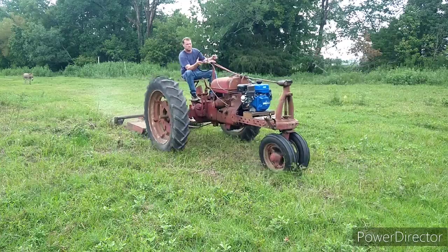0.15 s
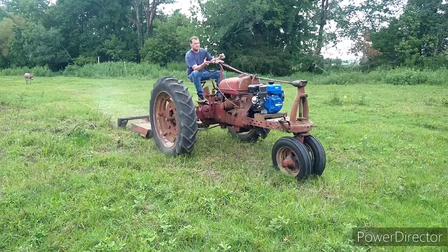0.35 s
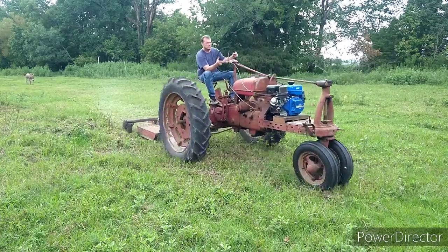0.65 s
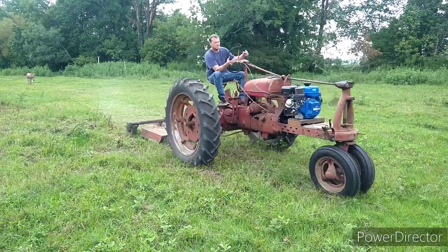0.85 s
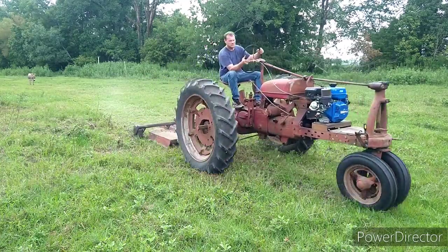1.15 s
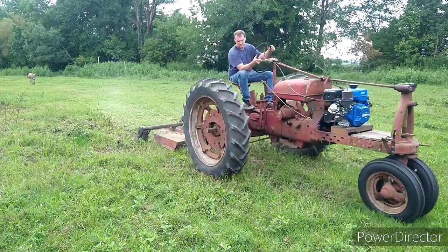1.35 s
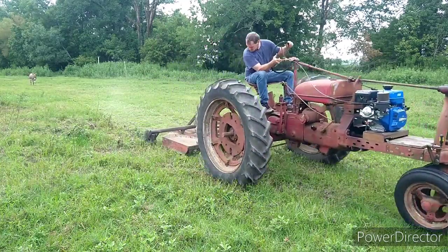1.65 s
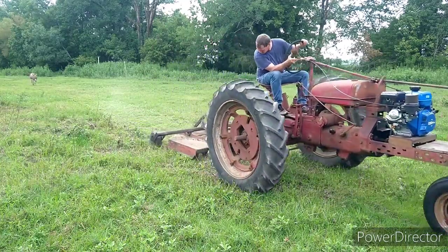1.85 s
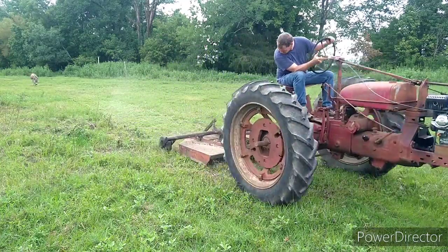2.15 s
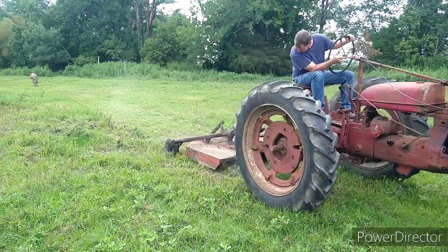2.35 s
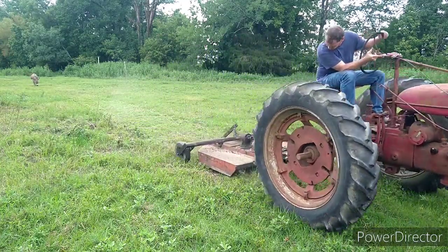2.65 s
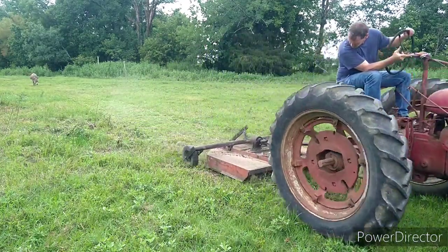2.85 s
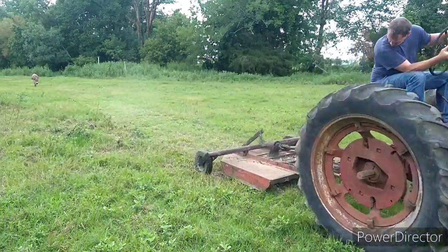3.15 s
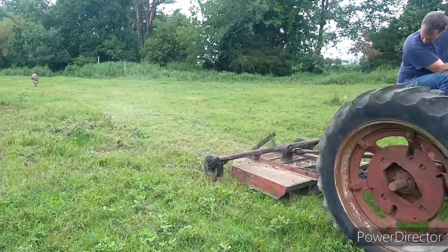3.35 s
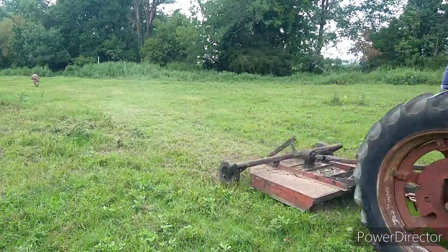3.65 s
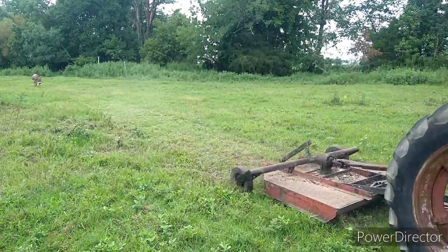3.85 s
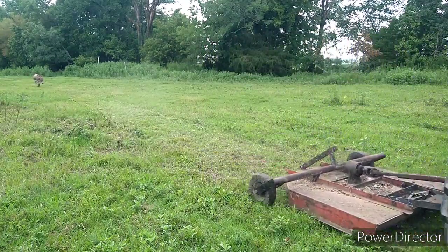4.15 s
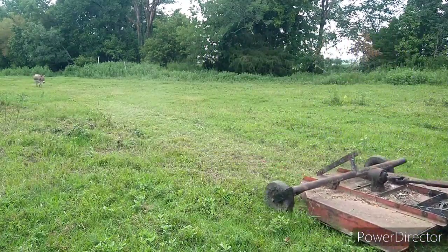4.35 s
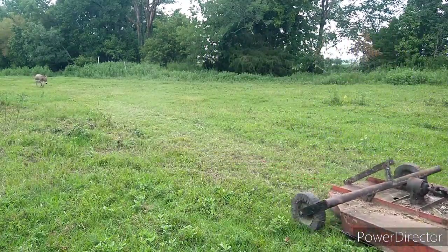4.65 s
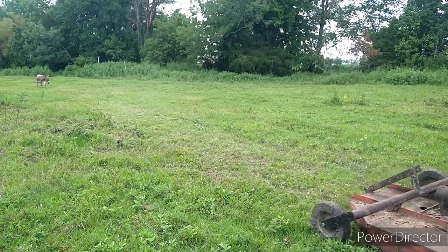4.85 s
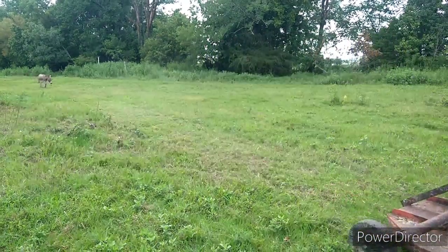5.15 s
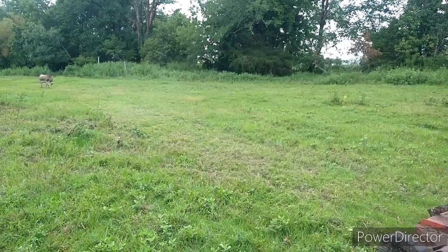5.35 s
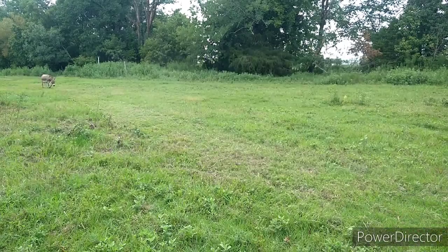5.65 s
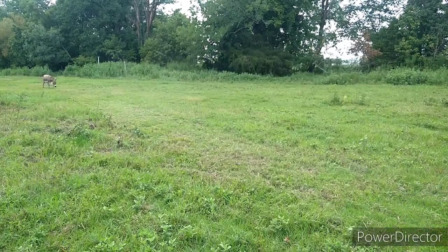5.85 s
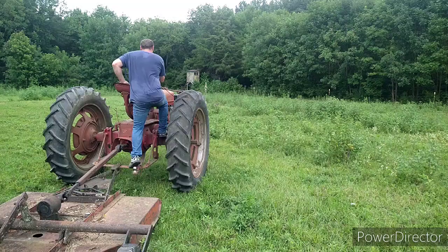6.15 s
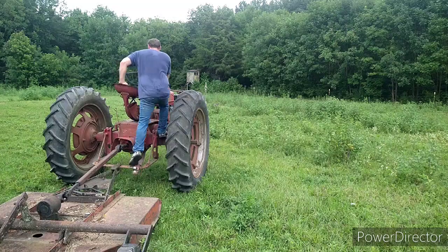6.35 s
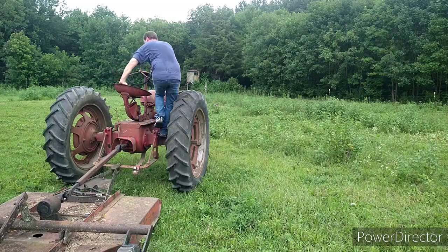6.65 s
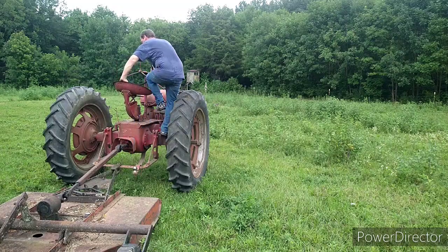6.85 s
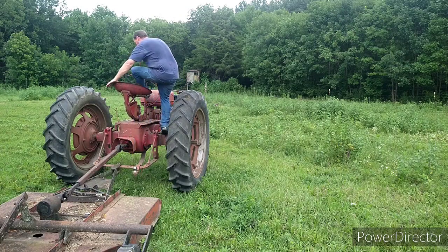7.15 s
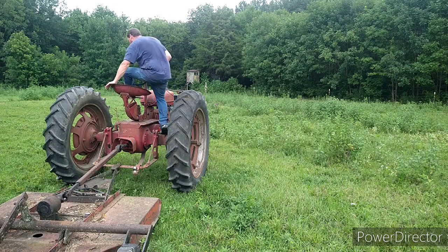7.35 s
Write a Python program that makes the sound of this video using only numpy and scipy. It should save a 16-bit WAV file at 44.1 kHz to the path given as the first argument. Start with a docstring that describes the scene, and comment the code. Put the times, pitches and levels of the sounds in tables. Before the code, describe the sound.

A tractor's small engine drones and clatters past towing a mower, fades away, and is then heard idling softly a few metres off.

```python
"""A small single-cylinder petrol engine drives a tractor and mower left to right past a two-port
microphone in a pasture. Each firing rings the muffler and casing and frees a jet of gas, over the noise
of fan, valves and mower; the governor hunts. The sound dips at 4.2 s, fades and drops out; a loud snippet
cuts back in. At 6.27 s the scene cuts to the same engine idling a few metres away, heard from behind:
the pipe thuds over a hum and ringing, a whine comes and goes, and at 7 s a shoe scuffs on the tractor."""
import sys
import numpy as np
from scipy import signal
from scipy.io import wavfile
from scipy.ndimage import uniform_filter1d, map_coordinates

SR = 44100
rng = np.random.default_rng(int(sys.argv[2]) if len(sys.argv) > 2 else 0)


def output_pcm(signal):
    """Save a mono or channel-first signal as 16-bit PCM at the path in sys.argv[1].

    Samples are clipped to [-1, 1] before scaling.
    """
    pcm = np.clip(np.atleast_2d(signal).T, -1, 1) * 32767
    wavfile.write(sys.argv[1], SR, np.round(pcm).astype(np.int16))


N = 330750
TIME = np.arange(N) / SR
SIDE_ON_MS = .48   # delay between the ports for a source fully to one side
CUT_S = 6.2706
IDLE_FIRST_S, IDLE_PERIOD_S = 6.2475, .07092


def from_db(db):
    """Amplitude ratio: tenfold for every 20 dB."""
    return 10 ** (np.asarray(db) / 20)


def rms_one(x):
    """Normalisation to unit mean power."""
    return x / np.sqrt(np.mean(x ** 2) + 1e-20)


def in_time(rows):
    """Linear interpolation of a table's columns at every sample."""
    times, *columns = np.transpose(rows)
    return [np.interp(TIME, times, column) for column in columns]


def at_hz(points, hz):
    """Interpolation of a spectrum's columns on a logarithmic frequency axis."""
    freqs, *columns = np.transpose(points)
    return [np.interp(np.log(hz), np.log(freqs), column) for column in columns]


def drift(rate_hz):
    """Low-passed noise: a slow random fluctuation of unit rms."""
    pole = np.exp(-80 * np.pi * rate_hz / SR)
    slow = signal.lfilter([1], [1, -2 * pole, pole * pole], rng.standard_normal(N // 40 + 2002))[2000:]
    return np.interp(np.arange(N) / 40, np.arange(len(slow)), rms_one(slow))


def resonate(x, hz, width):
    """Forced response of a damped oscillator, at unit rms."""
    radius = np.exp(-np.pi * width / SR)
    feedback = [1, -2 * radius * np.cos(2 * np.pi * hz / SR), radius * radius]
    return rms_one(signal.lfilter([1, 0, -1], feedback, x + 1e-18))


def clicks(times, spread_db):
    """Impulse excitation: one pulse of random strength at each time."""
    out = np.zeros(N)
    at = np.clip(np.round(times * SR).astype(int), 0, N - 1)
    out[at] = from_db(spread_db * rng.standard_normal(len(at)))
    return out


def ports(shared, own, hz, lag_ms):
    """Partial coherence: two ports mix shared and scattered sound; the microphone shades the left."""
    # likeness of the ports: (frequency [Hz], coherence in front [ratio], change side-on [ratio])
    likeness = [(30, .7, 0), (60, .97, 0), (500, .98, 0), (1200, .98, -.25), (2000, .88, -.03),
                (2800, .84, -.06), (4000, .72, -.15), (8000, .55, -.12), (14000, .3, 0)]
    # close by, engine and mower fill a wide angle and the ports agree less: (time [s], exponent [1])
    spread = [(0, 1), (1.5, 1.1), (2.4, 1.6), (2.9, 1.3), (3.6, 2.3), (4.3, 1.8), (5.0, 1), (5.6, .7),
              (6.27, .7), (6.28, 1)]
    # left port re right: (frequency [Hz], level in front [dB], change side-on [dB])
    shade = [(60, -0.9, 2.5), (400, 0.7, 1), (1200, 0, 1.5), (2500, -0.6, 0.7), (5000, -0.5, -3),
             (6600, -0.5, -6), (8940, -6.5, -3), (11000, -1.5, -6.5), (13830, 2, -11)]
    front, side = at_hz(likeness, hz)
    coherence = np.clip(front + side * lag_ms / SIDE_ON_MS, 0, 1) ** in_time(spread)[0]
    front_db, side_db = at_hz(shade, hz)
    tilt = from_db((front_db + side_db * lag_ms / SIDE_ON_MS) / 2)
    pair = np.sqrt(coherence) * np.array([shared, shared]) + np.sqrt(1 - coherence) * own
    return pair * [tilt, 1 / tilt]


def left_late(pair, lag_ms):
    """Path difference shifts the left channel in time; a positive lag delays it."""
    late = map_coordinates(pair[0], [np.arange(N) - lag_ms * SR / 1000], order=3, mode="nearest")
    return np.array([late, pair[1]])


def banded_noise(spectrum, level_db, lag_ms, flicker_db):
    """Random amplitude modulation of third-octave noise bands, each following level_db(hz)."""
    out, common_flicker = 0, drift(6)
    edges = 28 * 2 ** (np.arange(29) / 3)
    centres = np.sqrt(edges[1:] * edges[:-1])
    gains = from_db(at_hz(spectrum, centres)[0])
    gains /= np.sqrt(np.sum(gains ** 2 * np.diff(edges)) / (SR / 2))
    white = rng.standard_normal((2, 3, N))
    for k, hz in enumerate(centres):
        band = signal.sosfilt(signal.butter(2, edges[k:k + 2], "band", fs=SR, output="sos"), white[k % 2])
        envelope = from_db(level_db(hz) + flicker_db * (0.58 * common_flicker + drift(14.0)))
        out = out + gains[k] * envelope * ports(band[0], band[1:], hz, lag_ms)
    return out


def rings(modes, lag_ms):
    """Resonances driven by noise; modes are (frequency [Hz], width [Hz], level [dB])."""
    white, out = rng.standard_normal((3, N)), 0
    for hz, width, level_db in modes:
        held = resonate(resonate(white, hz, width), hz, width)
        out = out + from_db(level_db) * ports(held[0], held[1:], hz, lag_ms)
    return out


def chamber(pulses, hz, width, late_ms=0, run_in_firings=8):
    """Three resonators in cascade give a steep-sided peak; earlier firings have set it going."""
    first = np.argmax(pulses > 0)
    period = np.argmax(pulses[first + 1:] > 0) + 1
    lead = np.zeros(run_in_firings * period)
    lead[first % period::period] = 1
    train = np.roll(np.concatenate([lead, pulses]), round(late_ms * SR / 1000))
    return resonate(resonate(resonate(train, hz, width), hz, width), hz, width)[-N:]


def governor(edge_s=.04, recovery_s=.09, full_loss_hz=3.0):
    """Hunting: each time the throttle shuts, the exhaust booms and speed bleeds away, then recovers."""
    # speed that the governor aims for: (time [s], firing rate [Hz])
    target_speed = [(0, 41.66), (.5, 41.95), (.8, 42.7), (1.25, 43.5), (1.6, 42.44), (2.15, 42.77),
                    (2.7, 42.1), (3.3, 43.45), (3.9, 41.86), (4.6, 42.93), (5.0, 42.0), (5.5, 41.7),
                    (5.75, 41.2), (6.3, 41.49)]
    # throttle closures: (start [s], length [s], firing rate lost [Hz], boom [dB])
    stumbles = [(.86, .16, 3.3, -37), (1.26, .11, 3.15, -36.5), (1.49, .06, 1.4, -55), (1.74, .06, .9, -55),
                (2.17, .11, 2.0, -36), (2.5, .14, 1.95, -55), (2.75, .06, 1.4, -55), (2.94, .06, 1.3, -55),
                (3.13, .08, 1.35, -55), (3.34, .15, 2.7, -41), (3.69, .12, .7, -50), (3.96, .08, 1.8, -41),
                (4.17, .06, 1.55, -46), (4.41, .06, 1.0, -50), (4.62, .12, 1.9, -43), (5.29, .07, 1.1, -45),
                (5.5, .07, .6, -55)]
    shut, lost_hz, boom = 0, 0, 0
    for start, length, loss_hz, boom_db in stumbles:
        age = TIME - start
        closed = np.clip(np.minimum(age, length + edge_s - age) / edge_s, 0, 1)
        shut += closed * loss_hz / full_loss_hz
        boom += from_db(boom_db) * closed
        recovery = np.exp(-np.maximum(age - length, 0) / recovery_s)
        lost_hz += loss_hz * np.clip(age / length, 0, 1) * recovery
    return in_time(target_speed)[0] - lost_hz, shut, boom


def pass_levels(shut, boom, snippet_s=6.24, snippet_db=8):
    """Envelopes of exhaust notes, clatter and hiss over time; after the fade a loud snippet cuts in."""
    # loudness as the tractor passes: (time [1/25 s, counted from -0.8 s], crank throb [dB], boom [dB],
    # eleven higher muffler notes from low to high [dB], clatter [dB], hiss [dB])
    envelopes = [(24.9, -38, -47, -70, -45, -37, -25.5, -24, -32.5, -32, -66, -63, -40, -52, -33.5, -28.5),
                 (34.2, -38, -51, -70, -39, -40, -25, -23, -38, -34, -56, -60, -38.5, -55, -33.5, -28),
                 (39.5, -38, -48, -65, -29, -32.5, -26.5, -24, -45, -42, -40, -62, -38, -55, -32.5, -28.5),
                 (47.8, -37, -49, -65, -30, -39.5, -29.5, -23, -32.5, -39, -45, -46, -40, -57, -33.5, -29.5),
                 (60.8, -37.5, -49, -69.5, -27, -20.5, -22.5, -25, -30, -32.5, -35.5, -55, -44, -50, -32.5, -27.5),
                 (70.3, -38, -54, -58, -30.5, -20, -30.5, -28.5, -32.5, -34.5, -38, -57, -43, -44, -33.5, -26),
                 (78.1, -40.5, -53, -45.5, -31, -21.5, -20.5, -41, -58, -38, -48, -56, -57, -41, -30.5, -27.5),
                 (86.7, -38.5, -63, -43.5, -27.5, -20, -23.5, -38, -41, -31.5, -36, -45, -49, -49.5, -32.5, -26.5),
                 (92.4, -42, -66, -42, -25, -20.5, -23, -37.5, -47, -32.5, -47, -67, -54, -57, -32.5, -28),
                 (96.6, -44, -64, -36, -26, -19.5, -24.5, -37, -34, -29, -39.5, -67, -57, -45, -32.5, -27),
                 (101.9, -47, -64, -38, -28.5, -21, -25, -38, -41, -29.5, -46, -60, -59, -39, -32, -27.5),
                 (109, -44, -59, -40, -58, -23.5, -24.5, -61, -37, -36, -33, -36, -64, -32, -31.5, -28),
                 (116.6, -42, -57, -34.5, -41, -23.5, -24, -51, -28, -30.5, -31, -37, -61, -39, -33, -28),
                 (121.3, -43, -48, -43.5, -29.5, -20, -23.5, -45, -37, -33, -31, -44, -61, -58, -34, -27.5),
                 (128, -43.5, -54.5, -48, -26.5, -19.5, -23, -35, -30, -30, -32, -57, -58, -52, -34.5, -27.5),
                 (133.6, -44, -60, -53, -31, -20.5, -25.5, -38, -45, -46, -40, -55, -60, -55, -33, -27),
                 (137.8, -44, -62, -58, -36, -24, -22.5, -45, -39, -45, -45, -43, -60, -56, -33, -29),
                 (142, -44, -54, -60, -40, -26, -22.5, -40, -47, -54, -60, -46, -60, -58, -32.5, -27.5),
                 (151.5, -44, -54, -62, -35, -27, -23, -39, -42, -60, -60, -46, -60, -60, -32.5, -27.5),
                 (156.8, -44, -43, -63, -36, -29.5, -28, -29.5, -40, -47, -45, -47, -54, -60, -34, -28),
                 (168, -37, -40.5, -61, -36, -27, -25, -31, -53, -57, -59, -61, -59.5, -60, -32, -29)]
    # effect of a full stumble on each of those parts: (level change [dB])
    stumble_db = [-2, -45, 6.5, -2.5, -1, 2.5, -2, -0.5, -1, -3, 8.5, -1.5, -7, 0, -1]
    # the pass fades out: (time [s], level [dB])
    fade = [(4.5, 1.5), (5.0, -2.5), (5.45, -5.5), (5.7, -9.5), (6.0, -14.5), (6.2, -28)]
    ticks, *columns = np.transpose(envelopes)
    times = ticks / 25 - .8
    levels = [np.interp(TIME, times, column) + change_db * shut
              for column, change_db in zip(columns, stumble_db)]
    levels[1] = 20 * np.log10(from_db(levels[1]) + boom)
    fade_db = np.where(TIME < snippet_s, in_time(fade)[0], snippet_db)
    return [level + fade_db for level in levels]


def firings(cycles, last_s=6.2, jitter_s=.00003):
    """Combustion gives one pressure pulse a cycle."""
    # pulses of the split-second snippet of engine sound just before the scene change: (time [s])
    snippet_pulses = [6.2255, 6.2495]
    fired = TIME[1:][np.diff(np.floor(cycles)) > 0]
    fired = np.append(fired[fired < last_s], snippet_pulses)
    return clicks(fired + jitter_s * rng.standard_normal(len(fired)), spread_db=.35)


def muffler(pulses, notes_db, lag_ms, waver_db=.8):
    """Cavity resonance: the pulses ring each muffler chamber after its own short delay."""
    # exhaust resonances: (frequency [Hz], width [Hz], delay [ms])
    modes = [(85.4, 20, 1.5), (130, 55, 1.5), (195, 18, 8.4), (283, 80, 5.14), (298, 104, 7.85),
             (346.5, 106, 7.43), (429, 123, 4.49), (533.5, 130, 2.24), (562, 84, 5.4), (584, 58, 0),
             (644, 121, 3.89), (856, 118, 2.5), (975, 80, 1.5)]
    share = np.sqrt(CUT_S * SR / N)   # refers the rms to the length of the pass
    out = 0
    for (hz, width, late_ms), level_db in zip(modes, notes_db):
        note = chamber(pulses, hz, width, late_ms)
        out += share * from_db(level_db + waver_db * drift(5.2)) * ports(note, 0, hz, lag_ms)
    return out


def casing(pulses, clatter_db, lag_ms):
    """Structural resonance: every firing rings the casing's weaker modes."""
    # casing modes: (frequency [Hz], width [Hz], level re clatter [dB], change side-on [dB])
    modes = [(159.6, 68, -12, -2), (736, 114, -15.5, 0.5), (1184, 82, -12, -4)]
    out = 0
    for hz, width, level_db, side_db in modes:
        gain = from_db(clatter_db + level_db + side_db * lag_ms / SIDE_ON_MS)
        out += gain * ports(chamber(pulses, hz, width), 0, hz, lag_ms)
    return out


def gas_jet(pulses, hiss_db, lag_ms, band_hz=(8600, 12000), decay_s=0.01, re_hiss_db=-6.5):
    """Jet noise: gas escapes in a short bright burst at each firing."""
    pole = np.exp(-1 / (decay_s * SR))
    burst = rms_one(signal.lfilter([1], [1, -2 * pole, pole * pole], pulses))
    bandpass = signal.butter(2, band_hz, "band", fs=SR, output="sos")
    gas = signal.sosfilt(bandpass, rng.standard_normal((3, N)))
    return from_db(hiss_db + re_hiss_db) * burst * ports(gas[0], gas[1:], band_hz[0], lag_ms)


def machinery_racket(clatter_db, hiss_db, lag_ms, treble_from_hz=2700):
    """Broadband noise of fan, valve gear and mower, its colour changing with bearing."""
    # low part of the noise: (frequency [Hz], relative spectral density [dB])
    rumble = [(28, -33), (50, -29), (100, -19), (150, -24), (210, -21), (330, -17), (450, -19), (600, -23),
              (780, -21)]
    # high part: (frequency [Hz], relative spectral density [dB])
    racket = [(850, -15.5), (1250, -21.5), (1700, -25), (2200, -23.5), (2600, -24.5), (3000, -13.5),
              (3400, -12), (4100, -12.5), (5000, -14), (6300, -20), (8500, -14), (11000, -20), (13500, -24),
              (16000, -18.5)]
    # colour gained from front to side: (frequency [Hz], level change [dB])
    side_colour = [(60, -9.5), (190, 5.5), (400, 10.5), (800, -6), (1000, 0.5), (1300, -8), (2000, -1.5),
                   (2700, 0.5), (3600, -3), (5000, -0.5), (6300, 8), (8500, -1.5), (11000, 1), (14500, 1)]

    def band_db(hz):
        """Treble follows the hiss and lower bands the clatter, tilted by bearing."""
        level_db = hiss_db + 0.5 if hz > treble_from_hz else clatter_db + 12.0
        return level_db + at_hz(side_colour, hz)[0] * (lag_ms / SIDE_ON_MS - .5)

    return banded_noise(rumble + racket, band_db, lag_ms, flicker_db=1.28)


def mower_whirr(lag_ms, side_rise_db=9.5):
    """Noise-driven resonances of the mower, heard more from the side."""
    # mower modes: (frequency [Hz], width [Hz], level in front re hiss [dB])
    modes = [(2002, 83, -24.5), (2393, 160, -27.5), (6370, 600, -23)]
    return from_db(side_rise_db * lag_ms / SIDE_ON_MS) * rings(modes, lag_ms)


def gear_whine(cycles, firing_hz, lag_ms, teeth=36, waver_db=2):
    """Tooth meshing gives a tone at a multiple of the firing rate."""
    # the whine comes and goes: (time [s], level re hiss [dB])
    swells = [(0, -15), (1.1, -24), (1.22, -7.5), (1.5, -14), (1.85, -22), (2.05, -8), (2.25, -22),
              (2.45, -1), (2.7, -26), (3.2, -34), (3.6, -15), (5.1, -17.5), (5.4, -26), (6.3, -13.5)]
    gain = from_db(in_time(swells)[0] + waver_db * drift(3.1))
    return ports(gain * np.sin(2 * np.pi * teeth * cycles), 0, teeth * firing_hz.mean(), lag_ms)


def metal_rings(lag_ms):
    """Random excitation of metal resonances adds bright peaks to the racket."""
    # metal modes: (frequency [Hz], width [Hz], level re hiss [dB])
    modes = [(3610, 870, -13), (9300, 190, -19.5)]
    return rings(modes, lag_ms)


def working_engine(puff_depth=.16, blade_depth=.08, blade_hz=70.6):
    """Superposition of the passing sources; firings and blade modulate the machinery's amplitude."""
    # bearing of the engine: (time [s], delay at the left port [ms])
    bearing = [(0, .003), (.8, .075), (1.8, .172), (2.7, .295), (3.1, .362), (3.45, .405), (4.2, .447),
               (4.7, .472), (6.3, .475)]
    lag_ms, = in_time(bearing)
    firing_hz, shut, boom = governor()
    *notes_db, clatter_db, hiss_db = pass_levels(shut, boom)
    cycles = np.cumsum(firing_hz) / SR + .3
    pulses = firings(cycles)
    notes = muffler(pulses, notes_db, lag_ms) + casing(pulses, clatter_db, lag_ms)
    jet = gas_jet(pulses, hiss_db, lag_ms)
    racket = machinery_racket(clatter_db, hiss_db, lag_ms)
    metal = mower_whirr(lag_ms) + gear_whine(cycles, firing_hz, lag_ms) + metal_rings(lag_ms)
    puff = puff_depth * np.cos(2 * np.pi * (cycles - .2))
    blade = blade_depth * np.cos(2 * np.pi * blade_hz * TIME)
    machinery = (1 + puff + blade) * (racket + from_db(hiss_db) * metal)
    return left_late(notes + jet + machinery, lag_ms)


def dropout_gate():
    """Amplitude gating: the pass drops out briefly twice and ends at the cut."""
    # dips in level: (start [s], end [s], level [dB])
    dropouts = [(4.2255, 4.2392, -24), (6.2255, 6.2492, -60)]
    gate = np.where(TIME < CUT_S, 1., 0.)
    for start, end, depth_db in dropouts:
        gate[(TIME > start) & (TIME < end)] = from_db(depth_db)
    return uniform_filter1d(gate, size=30)


def pipe_thuds(lag_ms, echo_s=0.0192, echo_gain=0.51, soft_hz=700):
    """Pipe resonance: slow firings and their reflection from the pipe's end ring the exhaust."""
    # exhaust modes: (frequency [Hz], width [Hz], level [dB])
    modes = [(66.4, 22, -54), (109, 25, -41), (146, 67, -48), (183, 33, -66), (243, 47, -65)]
    pulses = clicks(np.arange(IDLE_FIRST_S, N / SR, IDLE_PERIOD_S), spread_db=1.2)
    pulses += echo_gain * np.roll(pulses, round(echo_s * SR))
    pushes = signal.lfilter(*signal.butter(2, soft_hz, fs=SR), pulses + 1e-18)   # soft, with no tick
    share = np.sqrt(1 - IDLE_FIRST_S * SR / N)   # refers the rms to the length of the idle
    return sum((-1) ** k * share * from_db(level_db) * ports(resonate(pushes, hz, width), 0, hz, lag_ms)
               for k, (hz, width, level_db) in enumerate(modes))


def idle_hum(lag_ms, level_db=-51.5, puff_depth=0.18, puff_late_s=0.026):
    """Amplitude modulation: a mechanical hum swells after each firing."""
    # colour of the hum: (frequency [Hz], relative spectral density [dB])
    spectrum = [(28, -19), (60, -31), (110, -25), (200, -16.5), (322, -34), (443, -17.5), (715, -31),
                (885, -21.5), (1250, -25.5), (2300, -35), (3600, -41.5), (8240, -49.5), (12000, -57.5),
                (16000, -58)]
    hum = banded_noise(spectrum, lambda hz: level_db, lag_ms, flicker_db=.5)
    cycles = (TIME - IDLE_FIRST_S - puff_late_s) / IDLE_PERIOD_S
    return hum * (1 + puff_depth * np.cos(2 * np.pi * cycles))


def idle_rings(lag_ms, waver_db=1.5):
    """Noise-driven resonances of the idling engine waver together in level."""
    # engine modes: (frequency [Hz], width [Hz], level [dB])
    modes = [(407, 110, -62), (806, 84, -59), (1724, 70, -70.5), (1970, 30, -67.5), (2263, 70, -66.5),
             (2520, 50, -73), (2820, 130, -75), (4200, 31, -80), (6260, 130, -77), (8200, 360, -81.5)]
    return from_db(waver_db * drift(16)) * rings(modes, lag_ms)


def idle_whine(lag_ms, hz=894, width_hz=27):
    """Narrow-band noise is heard as a pitch: the idling engine whines."""
    # the whine comes and goes: (time [s], level [dB])
    swells = [(6.3, -51), (6.35, -51.5), (6.564, -55.5), (6.61, -59.5), (6.656, -48), (6.74, -67),
              (6.854, -47.5), (6.978, -59), (6.998, -48), (7.272, -51.5), (7.352, -64), (7.5, -55)]
    return from_db(in_time(swells)[0]) * rings([(hz, width_hz, 0)], lag_ms)


def shoe_scuff(lag_ms, hz=1300, width_hz=1700):
    """Friction noise: a shoe scuffs once on the tractor."""
    # envelope of the scuff: (time [s], level [dB])
    envelope = [(7.04, -90), (7.06, -51), (7.12, -55), (7.22, -61), (7.3, -90)]
    return from_db(in_time(envelope)[0]) * rings([(hz, width_hz, 0)], lag_ms)


def idling_engine():
    """Superposition of the sounds at idle, all from one fixed bearing."""
    lag_ms = np.full(N, -.09)
    engine = pipe_thuds(lag_ms) + idle_hum(lag_ms) + idle_whine(lag_ms)
    return left_late(engine + shoe_scuff(lag_ms) + idle_rings(lag_ms), lag_ms)


def scene():
    """A crossfade of under a millisecond cuts from the pass to the idling engine."""
    idle_gate = uniform_filter1d(np.where(TIME < CUT_S, 0., 1.), size=30)
    return dropout_gate() * working_engine() + idle_gate * idling_engine()


def record(dry, stop_hz=15900):
    """Band limiting: a steep low-pass filter removes the highest treble."""
    return signal.sosfilt(signal.cheby2(14, 60, stop_hz, fs=SR, output="sos"), dry)


dry = scene()
out = record(dry)
output_pcm(out)
```